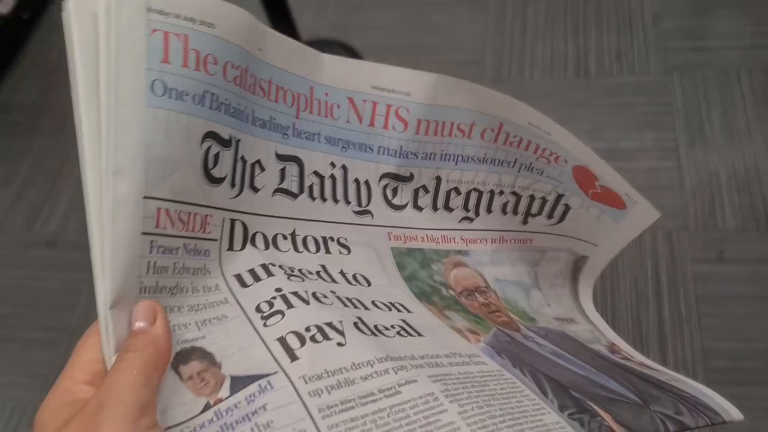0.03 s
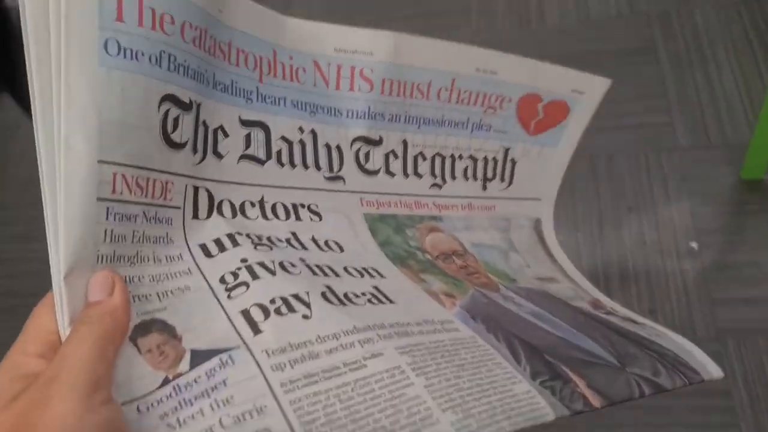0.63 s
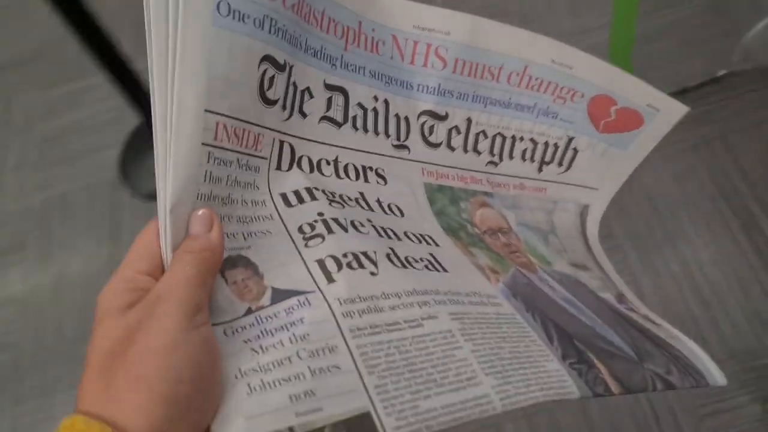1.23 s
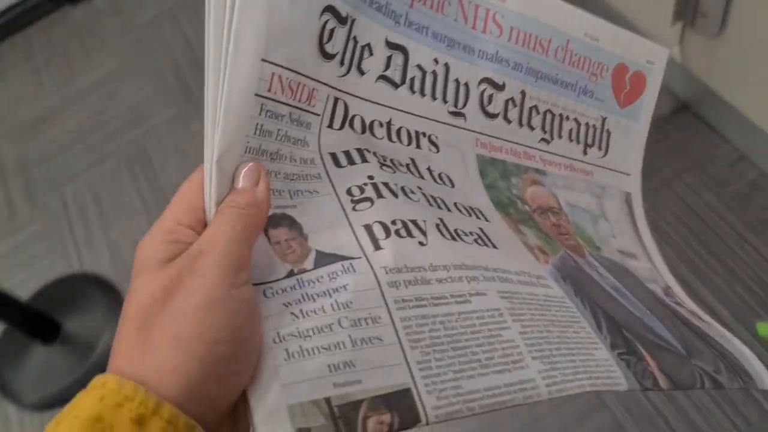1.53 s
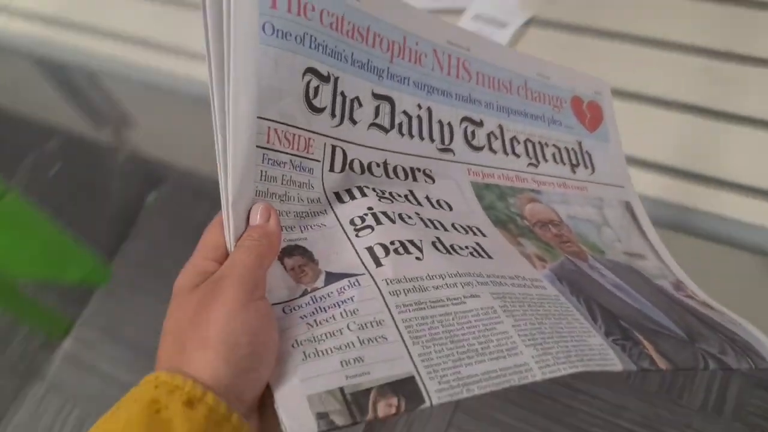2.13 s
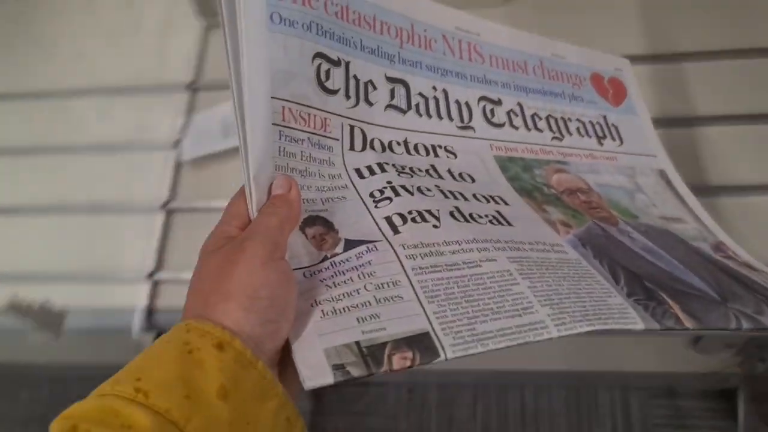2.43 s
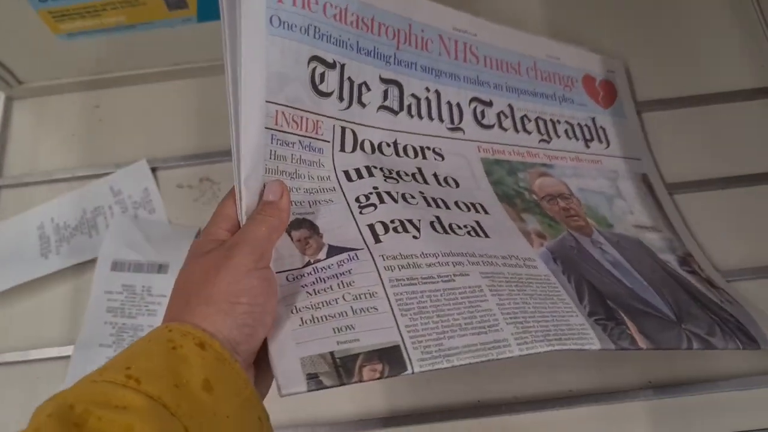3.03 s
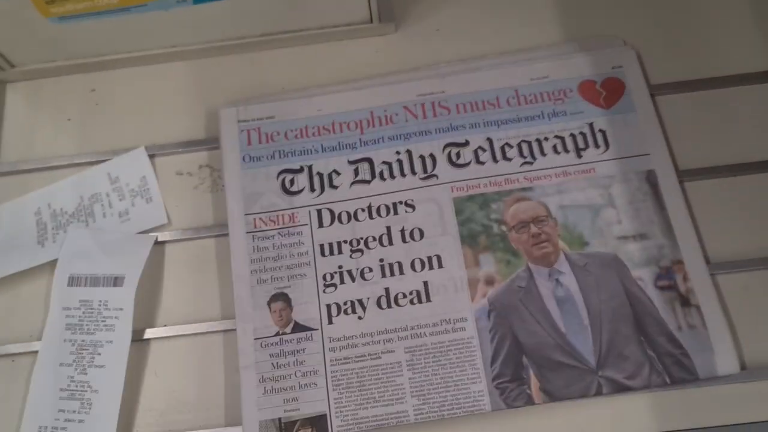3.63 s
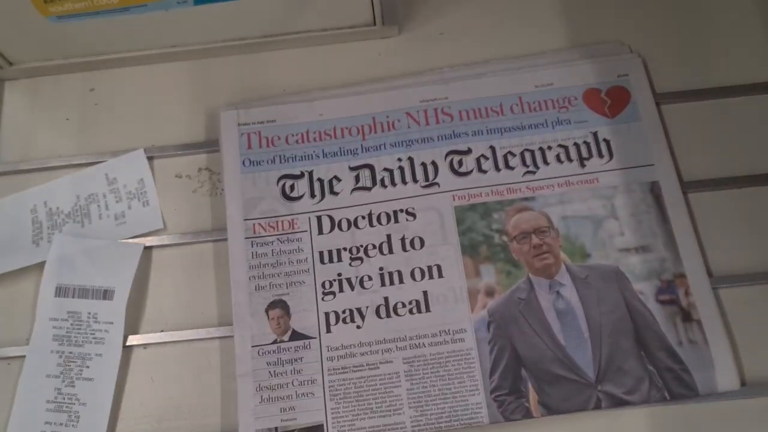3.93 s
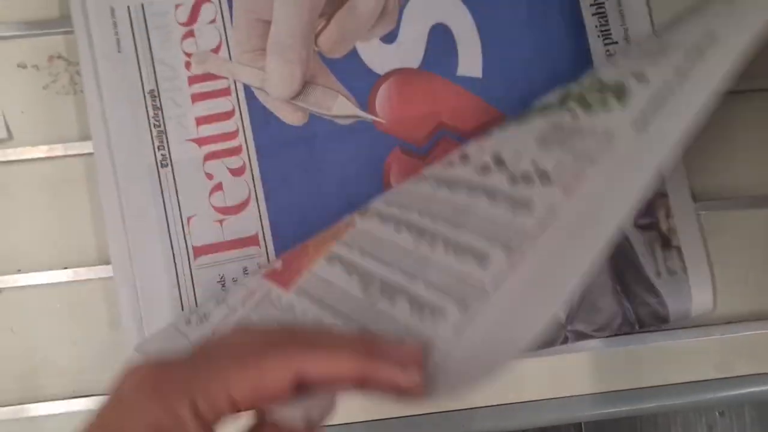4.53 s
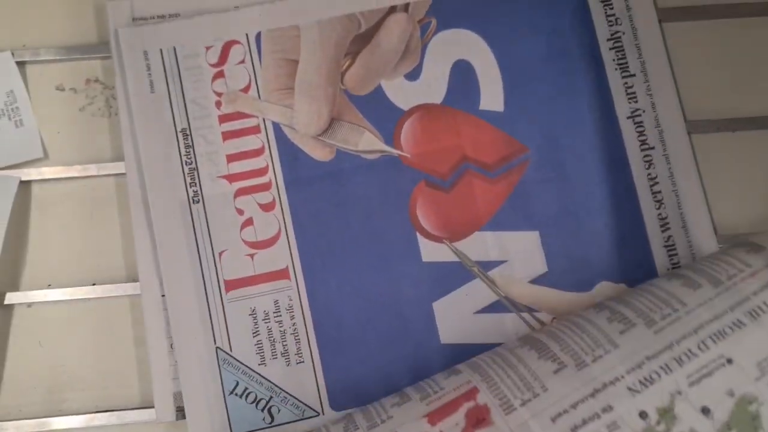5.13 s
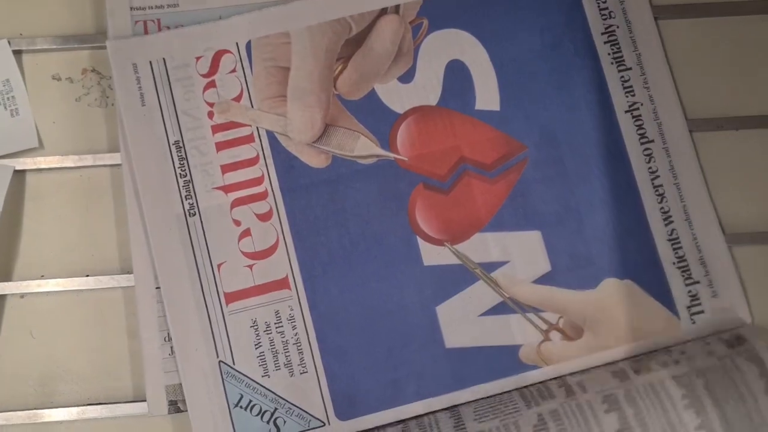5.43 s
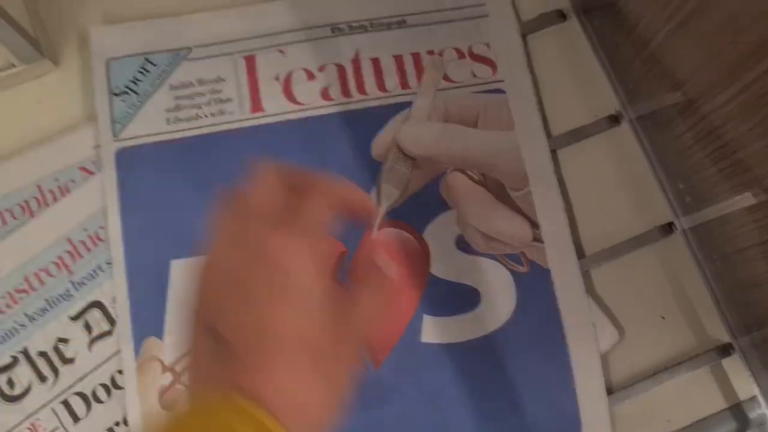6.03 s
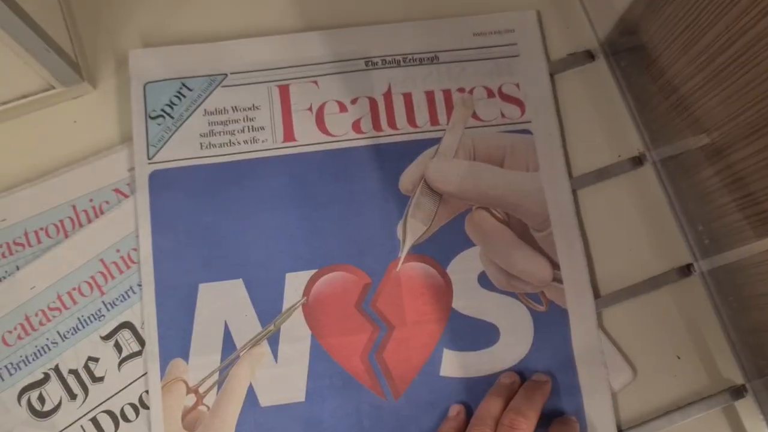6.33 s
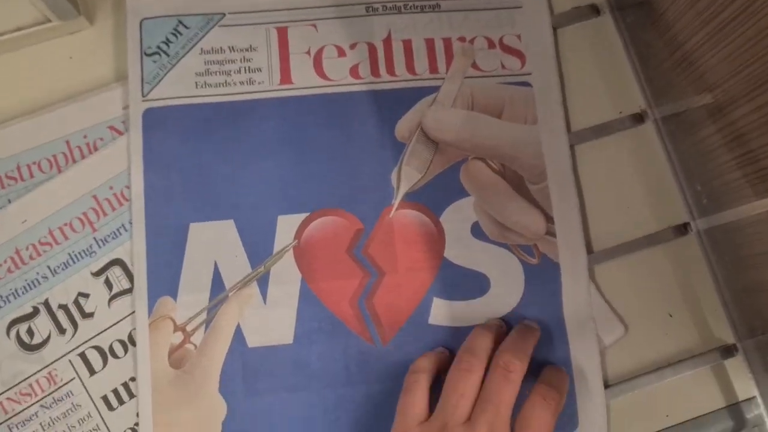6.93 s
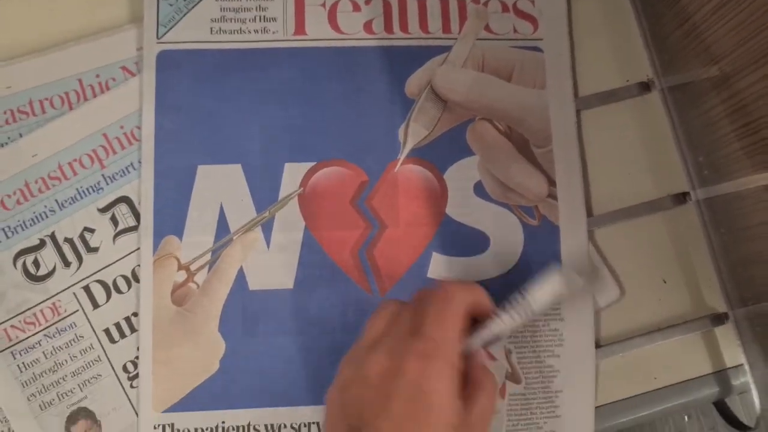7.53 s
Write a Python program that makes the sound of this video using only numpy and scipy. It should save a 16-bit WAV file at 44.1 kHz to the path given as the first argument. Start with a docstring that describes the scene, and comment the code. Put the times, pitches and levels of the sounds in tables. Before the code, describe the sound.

Ventilation rumbles, rushes and hums throughout in a small, dry shop room, heard through a handheld phone. For the first 2.5 seconds, shoes scuff over carpet in about five steps, some with a thin, hissy squeak. From about 2 seconds a newspaper slides softly close by with a grainy hiss. At 3.3 seconds a crease snaps, and at 3.4 the paper slaps onto a metal shelf, the loudest sound, with a very short ring. Sheets slide again at 4.2 seconds. Around 4.7 and 5.4 seconds, turning pages crackle and fall, each time with a soft, low puff of air. Light rustling continues to just past 6 seconds, followed by a quieter moment with a few faint ticks. From 7 seconds fingers rub and loosen a page with a brighter hiss and small snaps, ending in a crisp crack near 7.8 seconds.

```python
"""A small, dry shop room: someone walks over carpet, slaps a newspaper on a metal shelf, turns its sheets.
Soles scuff and squeak on the pile. Newsprint slides with a grainy hiss, creases buckle and snap,
falling sheets push out air and the slap rings the shelf. Ventilation rumbles, rushes and hums throughout.
Heard through a handheld phone's two microphones, the right one a little more sensitive."""
import sys
import numpy as np
from scipy import signal
from scipy.fft import rfft, irfft, next_fast_len
from scipy.io import wavfile
from scipy.ndimage import map_coordinates

SR = 44100
rng = np.random.default_rng(int(sys.argv[2]) if len(sys.argv) > 2 else 0)


def digitize_waveform(pressure):
    """Quantize a signal to 16-bit integers and store it at the path in sys.argv[1].

    Rows of a 2-D input are taken as channels; values are limited to [-1, 1].
    """
    field = np.atleast_2d(pressure).T
    bounded = np.clip(field, -1, 1)
    quanta = np.round(bounded * 32767).astype(np.int16)
    wavfile.write(sys.argv[1], SR, quanta)


N = 343980

# thick fold hitting the shelf: (time [s], level [dB], hold [s], t60 [s], low-pass [Hz])
LANDING = [(3.4032, -12, 0.0042, 0.064, 1510), (3.405, -14, 0.0044, 0.067, 4240),
           (3.409, -14.5, 0.0092, 0.068, 15000)]


def amp(db):
    """Decibels to gain."""
    return 10 ** (np.asarray(db) / 20)


def unit(x):
    """Scaled to rms 1."""
    return x / np.sqrt(np.mean(x ** 2) + 1e-20)


def along(points, hz):
    """(Hz, value) points read on a log axis."""
    f, v = np.transpose(points)
    return np.interp(np.log(hz + 1), np.log(f + 1), v)


def shaped(spectrum):
    """Gain curve of a (Hz, dB) spectrum."""
    return lambda hz: amp(along(spectrum, hz))


def curves(rows):
    """One value per sample for each column after the time."""
    s, *cols = np.transpose(rows)
    return [np.interp(np.arange(N) / SR, s, c) for c in cols]


def wobble(per_s):
    """Smooth random curve, per_s knots a second."""
    return map_coordinates(rng.standard_normal(int(N * per_s / SR) + 4), [np.arange(N) * per_s / SR])


def filtered(x, response):
    """x through a frequency response."""
    n = x.shape[-1]
    m = next_fast_len(n + SR // 10)
    return irfft(rfft(x, m) * response(np.fft.rfftfreq(m, 1 / SR)), m)[..., :n]


def add(track, s, sound):
    """Mixes a sound into the track at time s."""
    start = round(s * SR)
    piece = sound[..., max(-start, 0):N - start]
    track[:, max(start, 0):][:, :piece.shape[-1]] += piece


def noise(colour, size=N):
    """Stereo noise of rms 1: bass reaches both microphones alike, treble does not."""
    # left-right likeness: (frequency [Hz], correlation [-1..1])
    likeness = [(30, 0.89), (100, 1), (290, 0.92), (640, 0.36), (1300, -0.27), (2600, -0.0035),
                (15000, -0.01)]
    angle = lambda hz: np.arccos(np.clip(along(likeness, hz), -1, 1)) / 2
    white = rng.standard_normal((2, size))
    mid, side = filtered(white, lambda hz: colour(hz) * [np.cos(angle(hz)), np.sin(angle(hz))])
    return unit(np.array([mid + side, mid - side]))


def contrast(hz):
    """Share of resonance contrast left: high modes crowd into plain hiss."""
    return 1 / np.hypot(1, hz / 7000)


def patchy(spectrum, depth_db):
    """Noise of drifting colour: gain patches a few hundred Hz wide, about 0.1 s long."""
    hz, _, z = signal.stft(noise(shaped(spectrum)), SR, nperseg=512)
    patch = np.outer(np.hanning(8), np.hanning(26))
    field = signal.fftconvolve(rng.standard_normal(z.shape[1:]), patch, "same")
    gain = amp(depth_db * contrast(hz)[:, None] * unit(field))
    return unit(signal.istft(z * gain, nperseg=512)[1][:, :N])


def catches(per_s, spread_db, life_s, size=N):
    """Fibres catching and slipping: an rms-1 envelope of tiny random bursts."""
    hits = rng.random(size) < per_s / SR
    energy = amp(spread_db * np.minimum(rng.exponential(size=size), 4)) ** 2
    power = signal.lfilter([1], [1, -np.exp(-1 / (life_s * SR))], hits * energy)
    return unit(np.sqrt(np.roll(power, size // 2)))


def gritty(envelope, carrier, grain):
    """Carrier roughened by grain, at the envelope's rms."""
    return unit(envelope * carrier * grain) * np.sqrt(np.mean(envelope ** 2))


def burst(spectrum, hz, q, rise_s, t60_s, grain, ripple_db):
    """Gritty noise swell round one resonance, with new minor resonances each time."""
    t = np.arange(len(grain)) / SR
    knots_hz = np.arange(0, SR / 2, 170)
    peaks_db = ripple_db * contrast(knots_hz) * rng.standard_normal(len(knots_hz))
    rippled = lambda f: amp(along(spectrum, f) + np.interp(f, knots_hz, peaks_db))
    colour = lambda f: rippled(f) / np.hypot(1, q * (f / hz - hz / (f + 1)))
    past_s = np.maximum(t - rise_s, 0)
    fading_s = past_s ** 2 / (past_s + rise_s)  # a slow stroke lingers at its top
    swell = np.minimum(t / rise_s, 1) * amp(-60 * fading_s / t60_s)
    return gritty(swell, noise(colour, size=len(t)), grain)


def ventilation():
    """Rumble and duct rush change colour on the way to the shelf, where rumble and fan hum grow."""
    # spectra in the aisle (far) and at the shelf (near): (frequency [Hz], level [dB])
    far_rumble = [(12, -46), (20, -12), (52, 6), (75, 10), (94, 1), (108, 3.5), (129, -3), (143, -15),
                  (170, 6), (220, -51), (370, -120)]
    near_rumble = [(12, -49), (20, -22), (49, -12.5), (70, -3.5), (92, 0), (120, 0.5), (146, -20),
                   (170, -19.5), (220, -37), (370, -120)]
    far_duct = [(76, -43), (130, -9), (167, -5.5), (242, -4), (275, -3), (296, -6.5), (327, -1.5),
                (516, -15.5), (707, -44), (750, -15), (980, -37), (1650, -120)]
    near_duct = [(76, -11), (130, -5.5), (145, -8.5), (173, -1.5), (199, -10.5), (237, -5.5), (265, -2.5),
                 (300, -5.5), (360, -2.5), (426, -12), (512, -17.5), (551, -24.5), (598, -45), (750, -23),
                 (980, -47), (1650, -120)]
    # air hiss: (frequency [Hz], level [dB])
    air_spectrum = [(320, -12.5), (550, -0.5), (651, -3.5), (718, -2), (793, -4), (925, -6.5), (1060, -5.5),
                    (1160, -7.5), (2180, -10), (2400, -12), (3100, -15), (5400, -23), (6350, -22.5),
                    (7190, -30), (11400, -32.5), (15800, -39)]
    # fan tones: (frequency [Hz], level [dB], phase waver [1/s])
    fan_tones = [(86.3, -40.5, 9), (273.5, -48, 18), (672, -63, 24), (777, -58.5, 20)]
    # walk to the shelf: (time [s], nearness [0..1])
    walk = [(1.2, 0.02), (3.2, 0.99)]
    # rushing air: (time [s], duct [dB], hiss [dB])
    rush_levels = [(0, -38, -46.5), (2.8, -38.5, -46.5), (4.0, -40, -48.5), (5.6, -40, -46),
                   (6.6, -37.5, -48.5), (7.8, -37, -48)]
    # rumble: (time [s], level [dB])
    rumble_levels = [(0, -45), (1.4, -40), (3.2, -37), (4.05, -40), (4.9, -35), (6.0, -36.5), (6.6, -34),
                     (7.3, -40), (7.8, -36)]
    duct_db, air_db = curves(rush_levels)
    near, = curves(walk)
    rumble_db, = curves(rumble_levels)
    blend = lambda a, b: np.sqrt(1 - near) * noise(shaped(a)) + np.sqrt(near) * noise(shaped(b))
    rumble = amp(rumble_db) * blend(far_rumble, near_rumble)
    duct = amp(duct_db) * blend(far_duct, near_duct)
    air = amp(air_db) * patchy(air_spectrum, depth_db=0.73)
    t = np.arange(N) / SR
    hum = sum(amp(db + 2.6 * wobble(per_s=3.6)) * np.sin(2 * np.pi * hz * t + 1.45 * wobble(per_s))
              for hz, db, per_s in fan_tones)
    return rumble + duct + air + amp(-6 + 5.2 * near) * hum


def scuff(hz, q, rise_s, t60_s):
    """One gritty contact of shoe and carpet pile."""
    # pile friction: (frequency [Hz], level [dB])
    carpet = [(380, -42), (650, -2), (827, 6.5), (1230, -1.5), (1530, -0.5), (1680, -0.5), (2680, -4.5),
              (3740, -5.5), (4500, -6.5), (6040, -5.5), (8210, -13), (10600, -10), (15800, -18)]
    pile = catches(per_s=1200, spread_db=2, life_s=0.0019, size=SR // 2)
    return burst(carpet, hz, q, rise_s, t60_s, pile, ripple_db=3.8)


def footsteps():
    """Heels touch down; soles drag over the pile, fizz at speed and catch with a hissy squeak."""
    # heel strikes: (time [s], level [dB], centre [Hz])
    heels = [(.4, -40.5, 1180), (1.034, -40.5, 950), (2.302, -31, 1580)]
    # sole drags: (time [s], level [dB], rise [s], centre [Hz], fizz [dB])
    drags = [(-.04, -38.5, 0.038, 3400, -62), (.472, -33.5, 0.048, 2470, -50),
             (1.052, -32.5, 0.033, 2480, -48), (1.585, -49, 0.088, 4200, -58),
             (2.289, -36, 0.026, 5000, -41.5)]
    # sole catches: (time [s], level [dB], centre [Hz], Q [-], t60 [s], overtone [relative dB])
    squeaks = [(.03, -46, 12500, 4.4, 0.18, -30), (1.052, -41.5, 5760, 5.8, 0.14, -28),
               (1.138, -40.5, 6660, 7.3, 0.28, -7), (1.141, -48, 9450, 9, .16, -25),
               (1.655, -51, 3670, 4.3, 0.34, -19), (1.713, -44, 7400, 0.84, 0.37, -16),
               (1.721, -33.5, 8200, 8.3, 0.069, -22), (2.329, -32, 3380, 6.4, .18, -26),
               (2.331, -32, 3950, 5.3, 0.22, -23)]
    overtone_ratio = 2.04
    out = np.zeros((2, N))
    for s, db, hz in heels:
        add(out, s, amp(db) * scuff(hz, q=3.8, rise_s=0.01, t60_s=0.08))
    for s, db, rise_s, hz, fizz_db in drags:
        add(out, s, amp(db) * scuff(hz, q=0.55, rise_s=rise_s, t60_s=0.23))
        add(out, s + 0.5 * rise_s, amp(fizz_db) * scuff(hz=10000, q=1.4, rise_s=0.022, t60_s=0.19))
    for s, db, hz, q, t60_s, overtone_db in squeaks:
        for ratio, partial_db in (1, 0), (overtone_ratio, overtone_db):
            partial = scuff(ratio * hz, ratio * q, rise_s=0.0024, t60_s=t60_s / np.sqrt(ratio))
            add(out, s, amp(db + partial_db) * partial)
    return out


def stroke(s, rise_s, hold_s, t60_s):
    """Envelope of one slide: gathers speed, holds, dies away."""
    t = np.arange(N) / SR - s
    attack = np.sin(np.pi / 2 * np.clip(t / rise_s, 0, 1)) ** 2
    return attack * amp(-60 * np.maximum(t - rise_s - hold_s, 0) / t60_s)


def paper_friction():
    """Sheets slide with a fine hiss and lower scrape, fingertips rub them, sparse fibres crackle."""
    # sheet on sheet: (time [s], rise [s], hold [s], scrape [dB], hiss [dB], t60 [s])
    slides = [(1.85, .05, 0.13, -58, -66, 0.92), (2.235, .04, .02, -54, -62, .4),
              (2.38, 0.085, 0.049, -49.5, -55, 1), (2.95, .08, .03, -68, -70, 1),
              (3.23, .05, .024, -48, -53, 1), (3.598, 0.1, 0.011, -66, -61.5, 0.77),
              (4.165, 0.043, 0.084, -52.5, -63, 0.97), (4.95, 0.2, .17, -57, -69, .5),
              (5.42, .17, 0.047, -57, -61, 0.65), (5.64, 0.07, 0.04, -55, -65.5, 0.11),
              (5.79, .025, 0.016, -55, -61, 0.24), (5.853, .07, .02, -52.5, -60, 0.45),
              (5.97, 0.068, .11, -60, -62.5, 1), (6.84, 0.027, 0.19, -56.5, -72, .8)]
    # fingers loosening a page: (time [s], rise [s], hold [s], body [dB], hiss [dB])
    rubs = [(7.038, 0.089, .02, -60, -59), (7.123, 0.071, 0.0099, -51.5, -46),
            (7.278, 0.0079, .022, -47.5, -47), (7.299, .098, 0.084, -50.5, -49.5),
            (7.501, 0.038, 0.02, -46, -48.5), (7.553, 0.084, 0.056, -47, -52),
            (7.679, 0.069, 0.025, -46, -48.5)]
    # friction spectra: (frequency [Hz], level [dB])
    slide_hiss = [(4000, -25), (6500, -2), (8000, 0), (11500, -0.5), (15800, -9.5)]
    slide_scrape = [(1000, -19), (2000, -4.5), (3000, 0.5), (4500, -4.5), (6000, -4), (7500, -22)]
    rub_body = [(710, -36), (1200, -6), (1600, -1.5), (2720, -1), (4200, -2), (6500, -14), (10000, -30)]
    rub_hiss = [(2500, -22), (4500, -3), (6000, 3), (7590, -2), (11500, -2), (13000, -7), (15800, -8)]
    heavy, light = sum(np.outer(amp([scrape_db, hiss_db]), stroke(s, rise_s, hold_s, t60_s))
                       for s, rise_s, hold_s, scrape_db, hiss_db, t60_s in slides)
    press, brush = sum(np.outer(amp([body_db, hiss_db]), stroke(s, rise_s, hold_s, t60_s=0.087))
                       for s, rise_s, hold_s, body_db, hiss_db in rubs)
    hiss = light * patchy(slide_hiss, depth_db=2.2)
    ticks = noise(shaped(slide_hiss)) * catches(per_s=120, spread_db=1.5, life_s=0.002)
    crackle = (light + brush) * amp(-7.5) * ticks
    scrape = heavy * patchy(slide_scrape, depth_db=3)
    rub = press * patchy(rub_body, depth_db=3.2) + brush * patchy(rub_hiss, depth_db=2.8)
    uneven_speed = amp(1.26 * wobble(per_s=22))
    grain = catches(per_s=3400, spread_db=2, life_s=0.0038)
    return (hiss + crackle + scrape + rub) * uneven_speed * grain


def crease_snaps():
    """Creases give way in runs of tiny cracks; loose folds are lower and slower than tight ones."""
    # creases buckling: (time [s], level [dB], centre [Hz], Q [-])
    snaps = [(3.221, -48, 7000, .5), (3.241, -37, 6000, .34), (3.286, -22, 6600, 1), (4.2, -51, 6000, .3),
             (4.698, -28, 1800, 1), (4.7012, -25.5, 3000, 0.63), (4.711, -35, 3500, .39),
             (4.724, -39, 6000, 1), (4.763, -35, 6960, 1.9), (4.769, -39, 4800, 0.96),
             (4.833, -34, 4200, 1.1), (4.84, -48, 7000, .7), (4.933, -55, 2800, 2.1),
             (5.362, -54, 7000, .5), (5.419, -40, 3000, 1.2), (5.4255, -34.5, 2090, 0.22),
             (5.6, -47, 11000, .5), (5.612, -48, 7000, .6), (5.825, -41.5, 2580, 1.3),
             (5.94, -49, 6000, .8), (5.953, -50, 8000, .6), (6.335, -53, 9000, .5), (6.567, -59, 10000, .6),
             (6.67, -41, 2860, 3.2), (6.865, -55, 9000, .5), (7.204, -37.5, 2180, 2.2),
             (7.207, -44, 6000, 1.3), (7.282, -47, 9000, .9), (7.437, -35, 3520, 1.8),
             (7.438, -46, 1910, 4), (7.54, -34.5, 3660, 2.5), (7.785, -29, 2360, 1.9)]
    # crease spectrum: (frequency [Hz], level [dB])
    crease = [(350, -25), (600, -1), (1050, -4), (1380, -6), (1670, -5), (2930, -10.5), (4360, -15.5),
              (6580, -16), (9520, -20), (12200, -17), (15800, -24)]
    rise_cycles, t60_s = 5.9, 0.051
    out = np.zeros((2, N))
    for s, db, hz, q in snaps:
        fibres = catches(per_s=2900, spread_db=4, life_s=0.0052, size=SR // 4)
        add(out, s, amp(db) * burst(crease, hz, q, rise_cycles / hz, t60_s, fibres, ripple_db=2.5))
    return out


def contacts(rows, spectrum):
    """Folded sheets hit in quick succession: grainy smacks that hold briefly, then decay."""
    out, t = np.zeros((2, N)), np.arange(SR // 2) / SR
    for s, db, hold_s, t60_s, lowpass_hz in rows:
        envelope = (1 - np.exp(-t / 0.0005)) * amp(-60 * np.maximum(t - hold_s, 0) / t60_s)
        sheets = catches(per_s=2530, spread_db=-8, life_s=0.0014, size=len(t))
        smack = noise(lambda hz: shaped(spectrum)(hz) / np.hypot(1, (hz / lowpass_hz) ** 2), size=len(t))
        add(out, s, amp(db) * gritty(envelope, smack, sheets))
    return out


def loose_edges():
    """Loose edges brush the shelf before the slap and settle after it."""
    # edge contacts: (time [s], level [dB], hold [s], t60 [s], low-pass [Hz])
    edges = [(3.325, -47.5, .043, .05, 4000), (3.379, -34.5, 0.029, .033, 3000),
             (3.434, -29.5, 0.015, .06, 5100), (3.488, -39, 0.01, 0.097, 5000)]
    # flap spectrum: (frequency [Hz], level [dB])
    flap = [(200, -15), (700, 3), (1400, 0), (2500, -3), (4200, -6), (7000, -8), (15800, -12)]
    return contacts(edges, flap)


def fold_slap():
    """The thick fold lands in hard contacts milliseconds apart."""
    # slap spectrum: (frequency [Hz], level [dB])
    spectrum = [(120, -55), (200, -21.5), (527, -8.5), (896, -6), (1140, -1), (1360, -15.5), (1900, -3),
                (2300, -9.5), (2590, -2), (2990, -11), (3800, -8.5), (4730, -14), (6220, -13.5),
                (15800, -15)]
    return contacts(LANDING, spectrum)


def shelf_ring():
    """The first hard contact rings the shelf; the paper on it damps high modes first."""
    # metal shelf modes: (frequency [Hz], relative level [dB])
    modes = [(372, -1), (488, 1), (673, 4), (785, 1.5), (1020, -2), (1185, 3.5), (1523, 7), (1804, -1),
             (1889, -2), (2062, -10), (2537, 4), (3106, -8), (3350, -2), (3825, -4), (4021, -8), (5819, -6),
             (6078, 1), (7612, -5)]
    out, t = np.zeros((2, N)), np.arange(SR // 2) / SR
    hz, db = np.transpose(modes)[:, :, None, None]
    phase = 2 * np.pi * rng.random((len(modes), 2, 1))
    t60_s = 0.12 * (hz / 1000) ** -0.2
    ring = amp(db - db.max() - 60 * t / t60_s) * np.sin(2 * np.pi * hz * t + phase)
    attack = 1 - np.exp(-t / 0.00087)
    add(out, LANDING[0][0], amp(-19.5) * attack * ring.sum(axis=0))
    return out


def air_puffs():
    """Air squeezed from under a falling sheet: a low push of a few cycles."""
    # puffs: (time [s], level [dB], frequency [Hz], t60 [s])
    puffs = [(3.408, -26, 204, 0.16), (4.708, -24, 84.5, 0.1), (5.429, -17.5, 91, 0.092)]
    out, t = np.zeros((2, N)), np.arange(SR // 4) / SR
    for s, db, hz, t60_s in puffs:
        add(out, s, amp(db - 60 * t / t60_s) * np.sin(2 * np.pi * hz * t))
    return out


def room(x):
    """Short diffuse tail, different at each microphone."""
    # room decay: (frequency [Hz], t60 [s])
    decay = [(200, 0.044), (2500, 0.3), (6000, 0.35), (14000, 0.24)]
    hz, t, z = signal.stft(rng.standard_normal((2, SR // 2)), SR, nperseg=256)
    tail = signal.istft(z * amp(-60 * t / along(decay, hz)[:, None]), SR, nperseg=256)[1]
    tail = np.pad(tail / np.linalg.norm(tail[0]), ((0, 0), (SR // 200, 0)))  # 5 ms pre-delay
    return signal.fftconvolve(x, tail, axes=1)[:, :N]


def scene():
    """Paper close by, feet farther off, ventilation all round."""
    # the paper lands to the left: (frequency [Hz], left over right [dB])
    left_bias = [(400, 0.5), (900, 3), (1700, 2), (3400, 3.5), (6500, 4), (12000, 6)]
    paper = crease_snaps() + paper_friction() + loose_edges()
    slap, feet = fold_slap(), footsteps()
    echo = room(amp(-14.5) * paper + amp(-13.5) * slap + amp(-5) * feet)
    landing = filtered(slap + shelf_ring(), lambda hz: amp(np.outer([0.5, -0.5], along(left_bias, hz))))
    return paper + landing + feet + echo + air_puffs() + ventilation()


def record(dry):
    """Unequal microphones, soft ceiling, band limit."""
    # microphone imbalance: (frequency [Hz], right over left [dB])
    right_bias = [(100, 0), (200, 1), (380, 3.5), (700, 0.5), (1300, 2), (2400, 5.5), (4400, 5.5),
                  (8000, 1.5), (15000, 4)]
    top_hz, taper_hz = 16200, 500
    heard = filtered(dry, lambda hz: amp(np.outer([-0.5, 0.5], along(right_bias, hz))))
    limited = heard / (1 + heard ** 6) ** (1 / 6)
    return filtered(limited, lambda hz: np.clip((top_hz - hz) / taper_hz, 0, 1) ** 2)


dry = scene()
out = record(dry)
digitize_waveform(out)
```